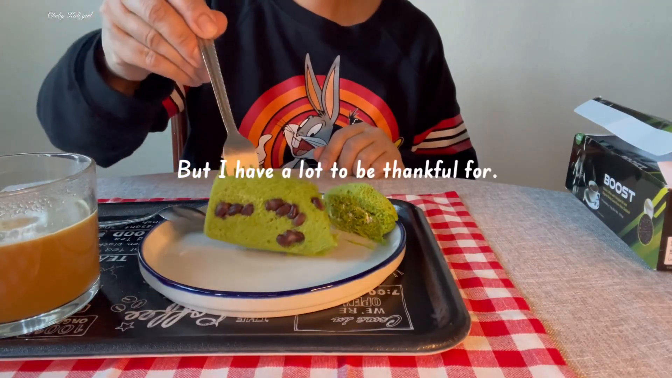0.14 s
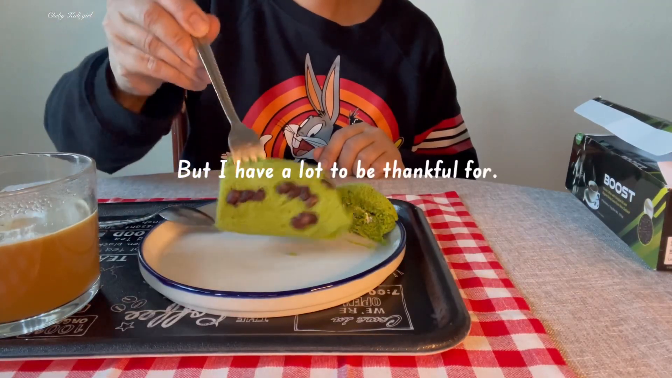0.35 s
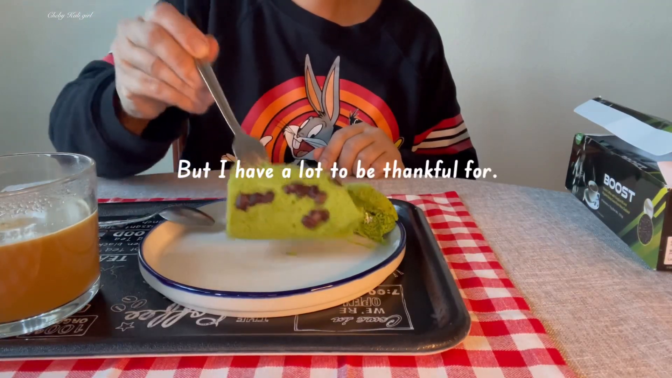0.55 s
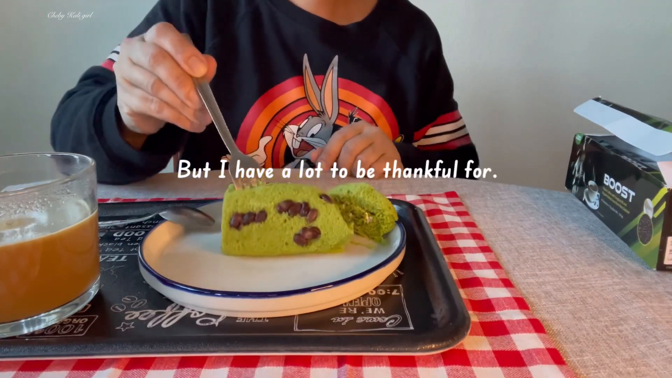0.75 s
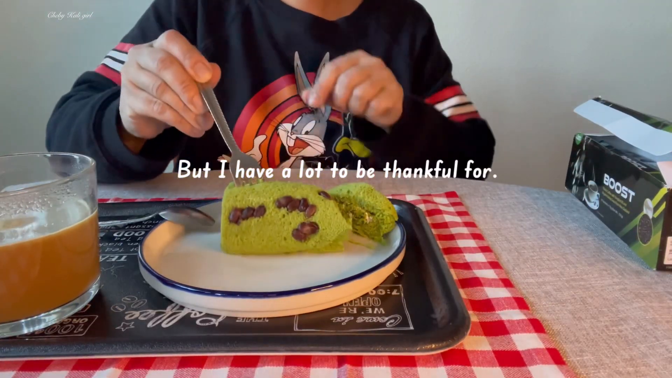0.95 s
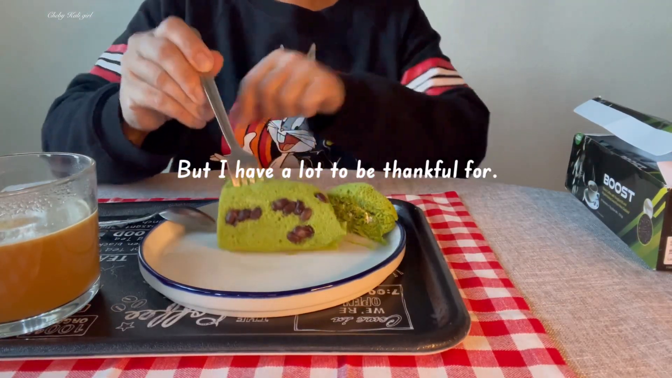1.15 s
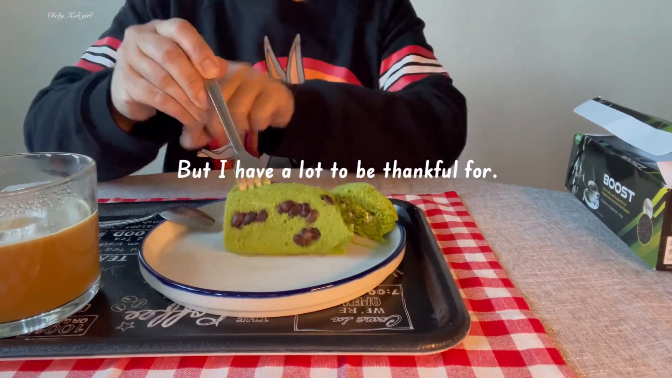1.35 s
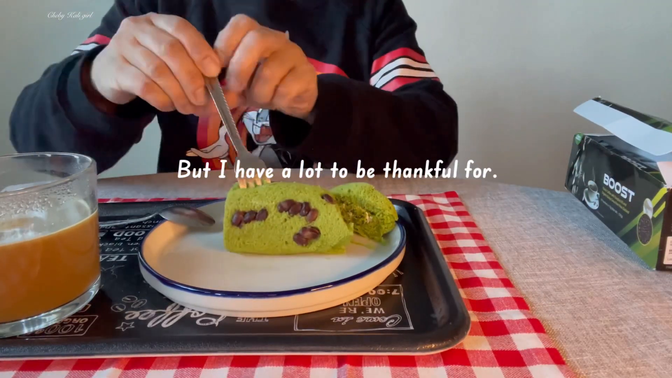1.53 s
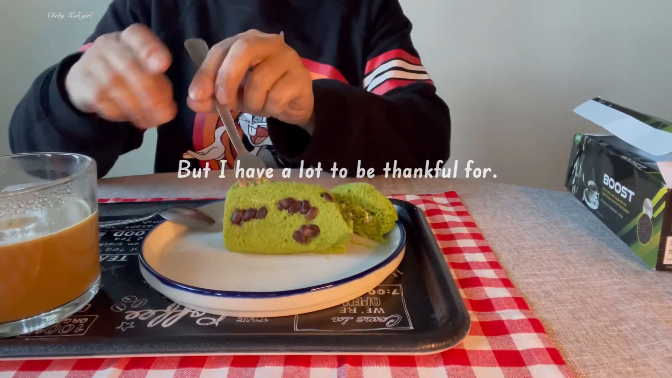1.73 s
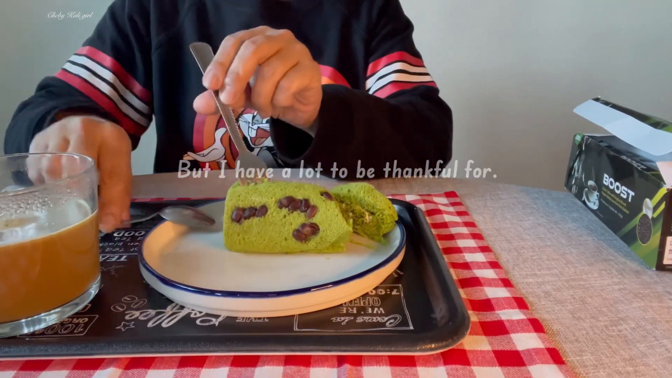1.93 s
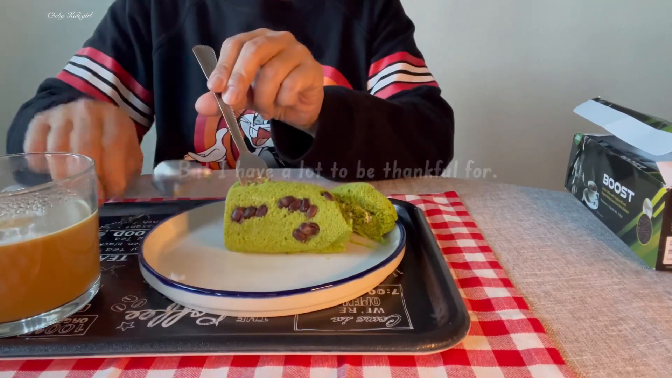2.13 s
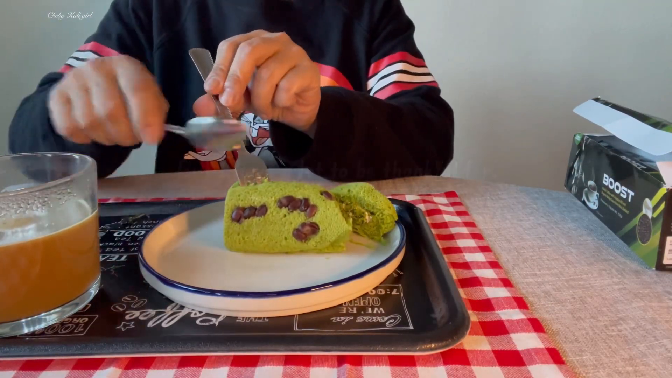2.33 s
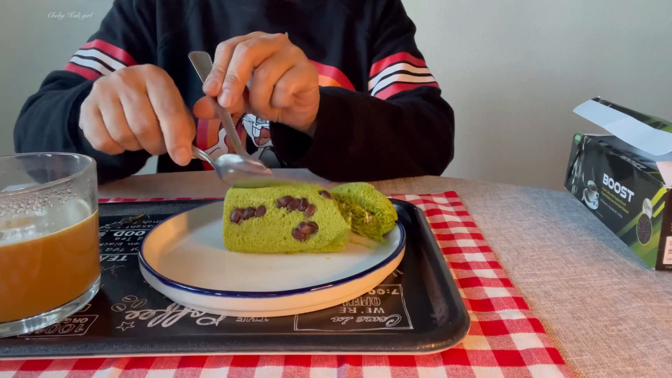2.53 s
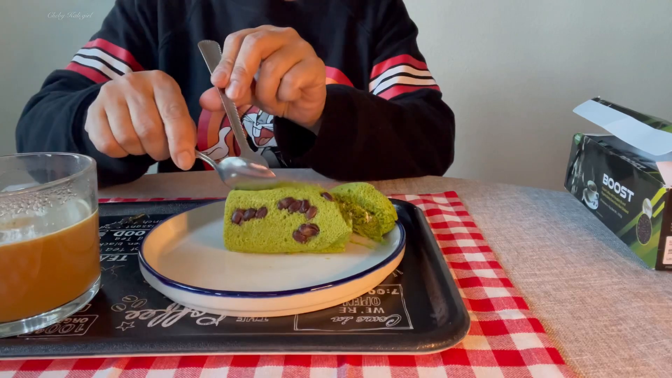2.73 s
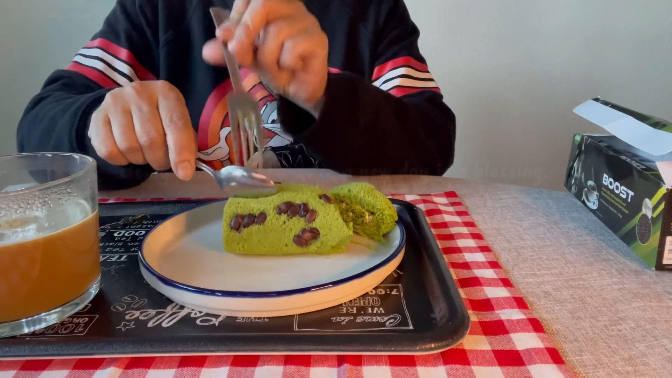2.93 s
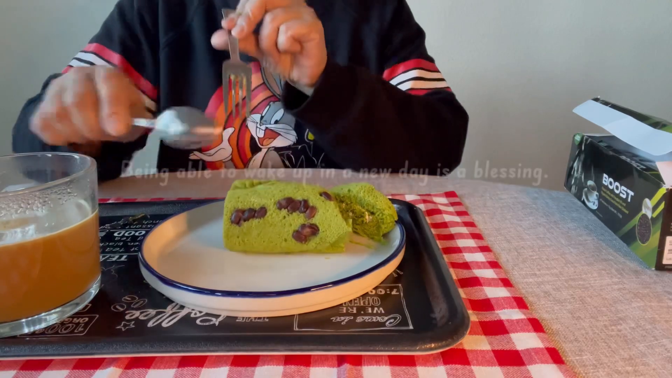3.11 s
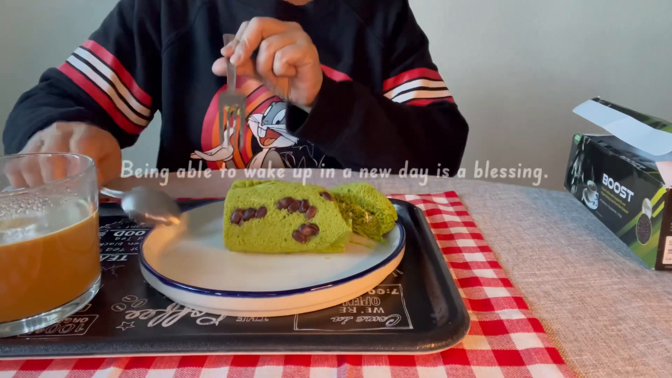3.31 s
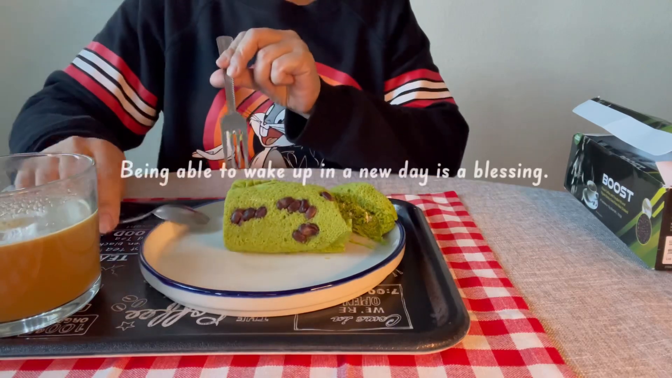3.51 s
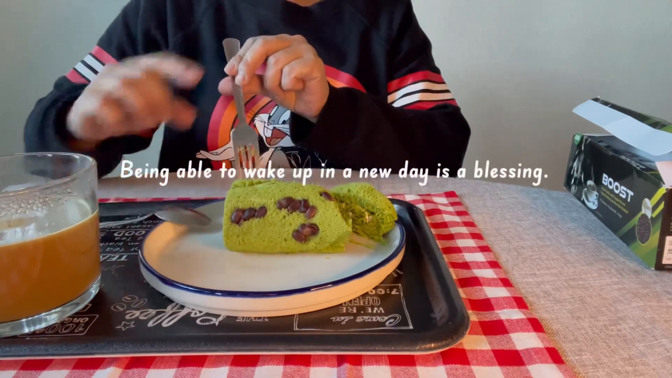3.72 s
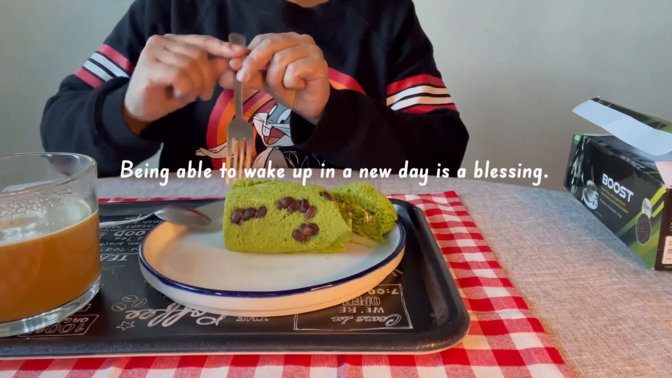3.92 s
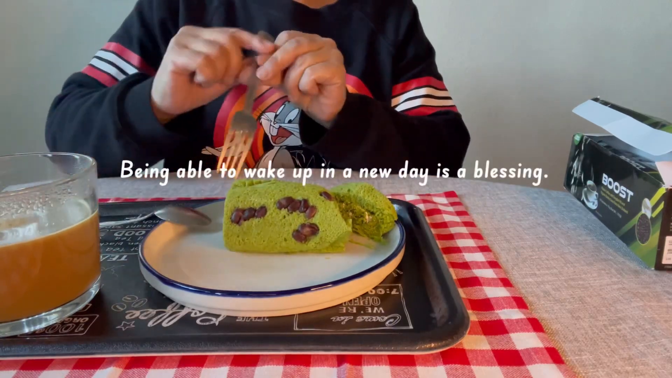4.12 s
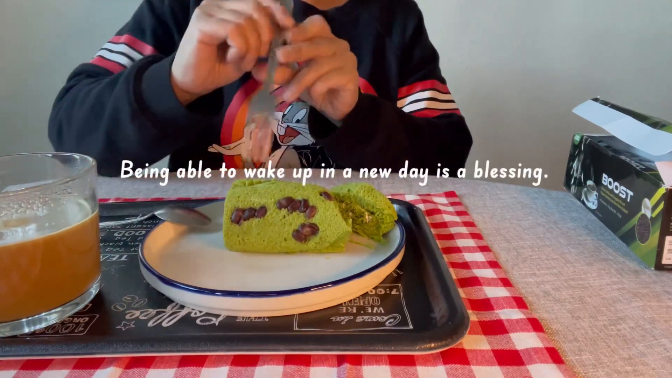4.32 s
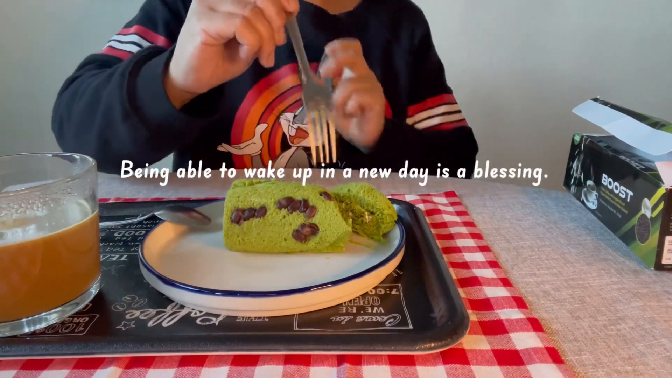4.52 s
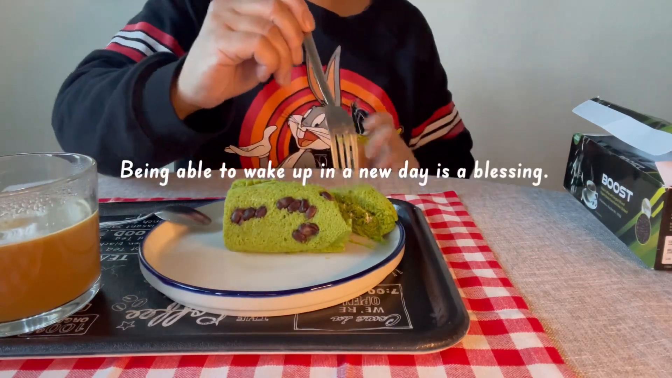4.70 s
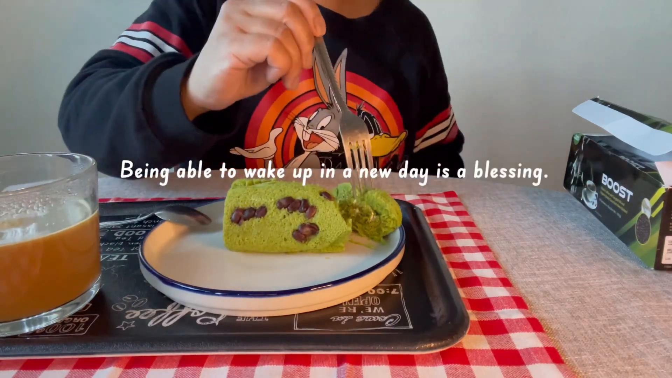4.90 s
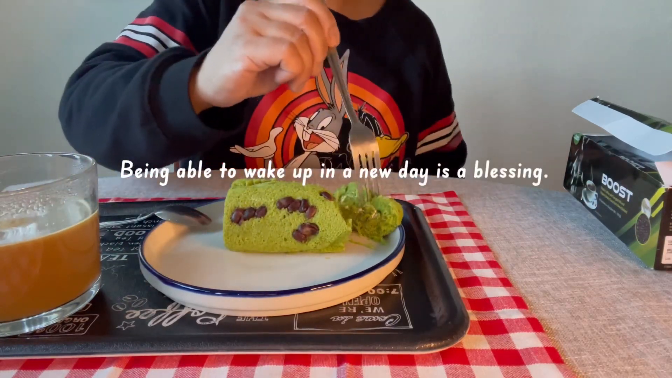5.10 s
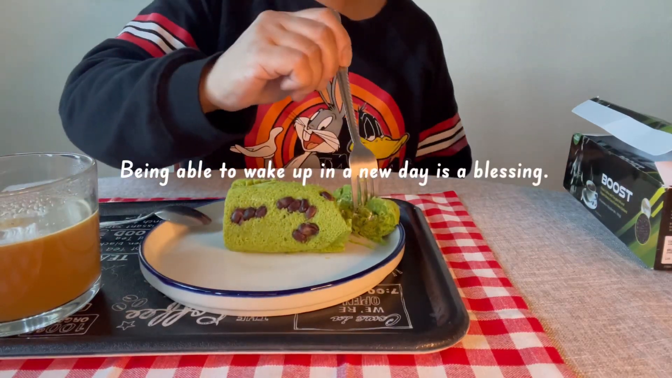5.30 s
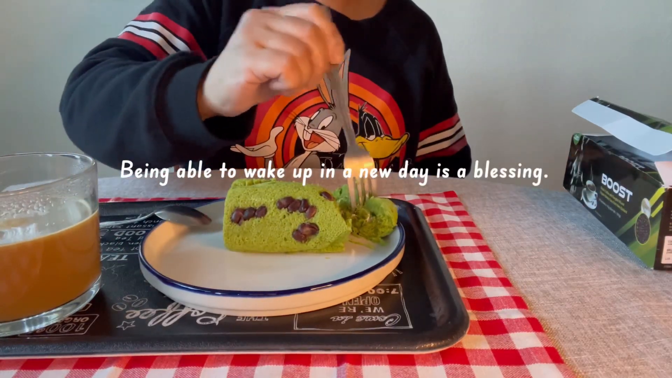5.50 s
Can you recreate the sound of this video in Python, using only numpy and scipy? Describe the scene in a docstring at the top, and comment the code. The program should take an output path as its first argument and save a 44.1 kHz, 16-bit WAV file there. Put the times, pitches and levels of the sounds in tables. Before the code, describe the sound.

A small room heard up close in stereo, with a steady low appliance and ventilation rumble, its motor tone wavering gently. The first second is nearly empty, with one barely audible dull tick around 0.8 s. At about 1.4 s a cluster of soft ticks and low thumps marks hands moving with a fork. Near 2 s two faint knocks land on a plastic tray, then at 2.1 s a spoon grates briefly off a ceramic plate with a small ping. Short, dry metallic taps of spoon on fork follow at 2.4, 2.55 and 3 s, with a soft bump at 2.6 s. At 3.3 s the spoon drops on the plate rim with a sharp, bright clink, bouncing more softly at 3.45 and 3.55 s, ringing briefly with short room echo. Then mostly hum, barely audible sliding after 4 s, a faint tick at 5 s and a quiet fork-on-plate touch at 5.3 s.

```python
"""Serving cake at a small table

Close stereo pair in a small room. Behind the cutlery an appliance rumbles: shaped noise with wavering tones.
A spoon is lifted from a ceramic plate, scrapes and taps a steel fork, then is dropped on the rim, where it
clinks and bounces twice. At the end the fork goes through the cake and touches the plate.
Contacts are noise clicks and decaying modes of steel, ceramic and a plastic tray; slides are uneven noise.
"""
import sys
import numpy as np
from scipy import signal
from scipy.fft import rfft, irfft
from scipy.io import wavfile

SR = 44100
rng = np.random.default_rng(int(sys.argv[2]) if len(sys.argv) > 2 else 0)


def bounce(signal):
    """Save signal as a 16-bit WAV file at the path given by the first command-line argument."""
    frames = np.transpose(np.atleast_2d(signal))
    limited = np.clip(frames, -1, 1)
    pcm = np.round(limited * 32767).astype(np.int16)
    wavfile.write(sys.argv[1], SR, pcm)


N = 244755
TIME = np.arange(N) / SR
FREQ = np.maximum(np.arange(N // 2 + 1) * SR / N, 1)

# Rumble of appliance and ventilation. Each row: frequency in Hz, relative density in dB per Hz.
AIR_SPECTRUM = [(22, -24.5), (48, -5.5), (85, -12.5), (125, -2), (170, -6), (250, -15), (330, -13.5),
                (430, -22), (580, -19), (760, -32.5), (1100, -32.5), (2400, -42), (5000, -57.5),
                (15000, -68)]
AIR_DB = -45
# Stereo width of the rumble. Each row: frequency in Hz, side against mid in dB.
AIR_SIDE = [(60, -13.5), (120, -23), (200, -10.5), (380, 0), (700, 4), (2000, -1), (15000, 0.5)]
# Lean of the background to one side. Each row: frequency in Hz, left minus right in dB.
AIR_LEAN = [(60, -1.5), (110, 0.0), (200, -2.5), (380, -3.5), (700, -0.5), (1290, 3.5), (2380, -0.5),
            (4400, 1.5), (8120, 1.5), (15000, -0.5)]
# Motor hum and fan whine. Each row: frequency in Hz, level in dB, width at half amplitude in Hz.
HUM_TONES = [(59.3, -65.5, 2.006), (117.1, -48, 5.6), (565, -72, 9), (1012.4, -73.5, 51), (1990, -78.5, 95)]

# Decay of the room. Each row: frequency in Hz, t60 in s.
ROOM_DECAY = [(200, 0.219), (1500, 0.404), (5000, 0.44), (9000, 0.3), (15000, 0.17)]
ROOM_DB, ROOM_BUILDUP_S = -12.5, 0.01

# Soft low thumps as the hands move. Each row: start in s, level in dB.
HAND_BUMPS = [(1.379, -33.5), (1.402, -31.5), (2.587, -34.5)]
TABLE_HZ, TABLE_T60_S = 47, 0.23

# The next five tables are modes of struck objects.
# Plastic tray under the plate. Each row: frequency in Hz, level in dB, t60 in s, lead of the left in rad.
TRAY_MODES = [(345, -11, 0.04, .2), (568, -7.5, 0.039, 0.25), (947, -5, .02, 0.5), (1298, 0, 0.024, -0.23),
              (1466, 1, 0.027, 0.31), (1614, -6, 0.0064, -.4), (1890, -9, .02, -.3),
              (2630, -9.5, 0.016, -.5)]
# Ceramic plate. Each row: frequency in Hz, level in dB, t60 in s, lead of the left in rad.
PLATE_MODES = [(1188, 1.5, .055, -.2), (1853, -1.5, .09, -.2), (2300, -15, .1, -.8), (2500, -4.5, .08, -.8),
               (2650, -13, .13, -.8), (3031, -4, .12, -.4), (3125, -7, .11, -.1), (3250, 1, .07, -.3),
               (3322, 1, .14, -.4), (3420, 5, .04, -.2), (3560, -8, .035, 0), (4199, -18, .12, .6),
               (4613, -13, .045, -1.8), (4850, -9, .06, -1), (6200, 4, .05, .2), (6350, -4, .07, .2),
               (6860, -4, .04, .9), (7250, -8, .05, .9)]
# Steel fork, damped by the hand. Each row: frequency in Hz, level in dB, t60 in s, lead of the left in rad.
FORK_MODES = [(900, 3, .028, .5), (1520, 3, .014, -.5), (3300, -7, .014, -.5), (4330, 1.5, .018, 3),
              (4750, 0, .018, 2.5), (5050, -2, .023, -1), (5380, 5, .022, 1.5), (5900, -1, .018, -1),
              (6950, 2, .015, 3), (8650, 6, .018, 2.5), (9050, 6, .022, 2.5), (10050, 7, .02, -2),
              (11200, 0, .025, -1.5), (13770, 0, .015, 2), (15330, 6, .015, -1.5)]
# Spoon gripped in the fingers. Each row: frequency in Hz, level in dB, t60 in s, lead of the left in rad.
HELD_SPOON_MODES = [(4020, -3, .025, 2), (4650, -2, .02, 2.5), (4990, 5, .025, -1), (6080, 1, .018, -1),
                    (7200, -7, .02, 2), (7740, -8, .086, 2), (8150, -13, .1, 2.5), (8580, 5, .018, 2.5),
                    (9950, -2, .018, -2), (11000, -6, .02, -1.5), (12500, -4, .02, 1), (13250, -14, .12, 1),
                    (13780, 9, .015, 2), (14150, 7, .012, 2), (15600, -3, .02, -1.5)]
# The same steel spoon, not gripped. Each row: frequency in Hz, level in dB, t60 in s, lead of the left in rad.
SPOON_MODES = [(5080, -10, .15, -2.3), (5902, -1, .09, -.7), (6011, 6.5, .1, -.6), (7497, -10.5, .22, 1.6),
               (7720, -9, .06, 1.0), (8285, -13, .09, 2.6), (9071, 4.5, .045, -3.14), (9800, -5, .06, -2.2),
               (10313, -10, .13, -1.5), (10490, -9, .13, -1.5), (11241, -1.5, .07, -.4),
               (12323, -4, .13, .7), (13374, -14, .08, 2.5), (13730, -20, .1, 1.5), (15330, -4, .06, -2.1),
               (15670, -11, .09, -2.1)]

# Contact noise before its tilt. Each row: frequency in Hz, relative density in dB per Hz.
CLICK_SPECTRUM = [(200, -12.5), (750, -8.5), (1500, -1.5), (2200, -3), (3200, 1), (4300, -2), (5300, 0),
                  (7000, -1.5), (8500, -10), (12000, -2.5), (14000, -15), (16000, -14)]
# A harder contact clicks brighter: no tilt at this cut-off, and so many dB per octave per octave above it.
NEUTRAL_CUT_HZ, HARDNESS_TILT_DB = 13500, 3.5
SLIDE_DB = -14.5  # slide into a contact, against that contact's strength

# Faint sliding of fingers on the fork, or of the fork in the cake.
# Each row: start in s, length in s, level at the end in dB, tilt in dB per octave.
FAINT_SCRAPES = [(0.98, 0.25, -76.5, -2.5), (4.058, 0.14, -77, -2), (4.25, 0.06, -77, 0),
                 (1.275, 0.039, -67, -5), (1.364, 0.13, -69, 4.5), (2.908, 0.074, -69, 3),
                 (4.977, 0.044, -62.5, -6.5)]
# Ticks of the fork in the cake or the fingers.
# Each row: start in s, level in dB, resonance in Hz, Q, t60 in s, tilt in dB per octave.
FORK_TICKS = [(0.775, -52, 2900, 2.7, 0.03, -7.5), (1.363, -39.5, 1750, 1.7, 0.025, -10),
              (1.3774, -39.5, 1550, 1.1, 0.016, -1), (1.4025, -42.5, 1550, 1.3, 0.019, -4),
              (1.4333, -44.5, 1780, 0.69, 0.021, -10), (5.003, -55, 1980, 1.1, 0.097, -3)]
# Dull knocks on the tray as the cutlery is handled.
# Each row: time in s, strength in dB, contact cut-off in Hz, slide into the knock in s.
TRAY_KNOCKS = [(1.9562, -44.5, 10980, 0.013), (1.989, -46, 4510, 0.0038)]

# The fork tines reach the plate through the cake.
TOUCH_S, TOUCH_DB, TOUCH_CUT_HZ = 5.3245, -54.5, 11000

# The spoon is picked up: it slides along the rim and pings as it leaves.
LIFT_S, LIFT_SLIDE_S, LIFT_DB, LIFT_CUT_HZ = 2.0913, .022, -41.5, 5160
# Resonances of the rubbed rim. Each row: frequency in Hz, Q, level in dB.
RIM_RESONANCES = [(2470, 6.2, -1), (3700, 6.3, -0.5), (6190, 30, 2)]

# Spoon against fork. Each row: time in s, strength in dB, place on the fork in bending half-waves at 1 kHz,
# contact cut-off in Hz, fork ring, spoon ring and tray ring in dB against the strength,
# slide into the tap in s, send to the room in dB.
FORK_TAPS = [ (2.4235, -29.5, 2.34, 17000, -5.5, -17, -1.5, 0.0018, 2),
             (2.552, -28, 0.45, 12600, -3, -18, -9, 0.015, -5.5),
             (2.813, -58, 0.33, 5500, 4, -3, -20, 0.053, 2), (2.834, -62, 0.37, 5500, 1, -3, -20, 0.01, -5),
             (2.979, -31.5, 3.3, 26000, -11.5, -1, -16, 0.00019, -4)]

# The dropped spoon lands and bounces. Each row: time in s, strength in dB, contact cut-off in Hz,
# place on the spoon and on the plate in bending half-waves at 1 kHz,
# spoon ring, plate ring, tray ring and first crack in dB against the strength, time to first rebound in s,
# level step per rebound in dB, lower and upper hollow in the clatter in Hz.
SPOON_LANDINGS = [ (3.3230, -11.5, 21000, 2.70, 7.86, 1.5, -7.5, -30, 4, .0108, -6.5, 5520, 11800),
                  (3.4382, -14, 18200, 6.80, 0.66, -6, -11, -12, 2.16, 0.011, -10, 4330, 6460),
                  (3.5279, -18.5, 14900, 0.23, 6.8, -10.5, -13.5, -7, 1.3, .0078, -5.5, 3890, 11550)]
# Every landing chatters: factors per rebound on the gap and on the contact cut-off.
REBOUND_SHRINK, REBOUND_SOFTENING = .7, .7
REBOUND_CLICK_DB = 3.5  # click of a rebound against its strength

TOP_HZ = 15900


def undb(db):
    """Decibels to gain."""
    return 10 ** (np.asarray(db) / 20)


def along(points, hz):
    """Read (Hz, value) points on a log-frequency axis."""
    f, value = np.transpose(points)
    return np.interp(np.log(hz), np.log(f), value)


def noise(gain):
    """Two unrelated noises of joint rms 1 with the given relative gain at each frequency."""
    x = irfft(rfft(rng.standard_normal((2, N))) * gain, N)
    return x / x.std()


def left_right(mid, side):
    """Turn a mid and a side signal into left and right."""
    return np.array([mid + side, mid - side])


def add(out, s, sound):
    """Mix a sound in at time s."""
    i = int(s * SR)
    out[:, i:i + sound.shape[1]] += sound[:, :N - i]


def fade(t, t60):
    """Exponential decay, 60 dB down after t60."""
    return np.exp(-np.log(1000) * t / t60)


def band(x, hz, q):
    """Pass a sound through one resonance."""
    return signal.lfilter(*signal.iirpeak(min(hz, SR / 2 - 1), q, fs=SR), x)


def hollow(x, hz, q=9):
    """Take a band out of a sound."""
    return signal.lfilter(*signal.iirnotch(min(hz, SR / 2 - 1), q, fs=SR), x)


def appliance(hum_side=0.17):
    """A steady rumble, nearly alike on both sides in the bass, with wavering motor and fan tones."""
    mid, side = rfft(noise(undb(along(AIR_SPECTRUM, FREQ))))
    width = undb(along(AIR_SIDE, FREQ))
    out = undb(AIR_DB) * irfft(left_right(mid, width * side) / np.hypot(1, width), N)
    for hz, db, width_hz in HUM_TONES:
        mid, side = noise(1 / (1 + (2 * (FREQ - hz) / width_hz) ** 2))
        out = out + undb(db) * left_right(mid, hum_side * side)
    lean_db = np.array([[1], [-1]]) * along(AIR_LEAN, FREQ) / 2
    return irfft(rfft(out) * undb(lean_db), N)


def room(x):
    """Diffuse echoes from the walls, unrelated left and right; each frequency band dies at its own rate."""
    t = TIME[:int(.7 * SR)]
    centres = np.geomspace(200, 16000, 8)
    white, tail = rfft(rng.standard_normal((2, N))), 0
    for hz, share in zip(centres, np.eye(len(centres))):
        # overlapping triangles on a log-frequency axis
        weight = np.interp(np.log(FREQ), np.log(centres), share)
        tail = tail + irfft(white * weight, N)[:, :len(t)] * fade(t, along(ROOM_DECAY, hz))
    tail = tail * np.clip(t / ROOM_BUILDUP_S, 0, 1) ** 2
    tail = tail / np.sqrt(np.sum(tail ** 2) / 2)
    return undb(ROOM_DB) * signal.fftconvolve(x, tail, axes=1)[:, :N]


def wash(x, share, width_hz):
    """Blur a share of each ringing tone into a band of noise, by slow random modulation."""
    share = np.clip(share, 0, 1)
    waver = noise(1 / (1 + (FREQ / width_hz) ** 4))
    return x * (np.sqrt(1 - share) + np.sqrt(share) * waver)


def sway(hz, t60):
    """One low, damped swing of the table top."""
    t = TIME[:SR // 2]
    return fade(t, t60) * np.sin(2 * np.pi * hz * t)[None]


def table(thud_hz=70, thud_db=-27, thud_t60=0.17):
    """The table top sways briefly under each bump of the hands and each landing of the spoon."""
    out = np.zeros((2, N))
    for s, db in HAND_BUMPS:
        add(out, s, undb(db) * sway(TABLE_HZ, TABLE_T60_S))
    for s, db, *_ in SPOON_LANDINGS:
        add(out, s, undb(db + thud_db) * sway(thud_hz, thud_t60))
    return out


def ring(modes, place=0, cut_hz=20000, node_db=-12, pan_db=0):
    """Struck modes. A blow near a node barely wakes that mode; each reaches the two microphones out of step."""
    t, out = TIME[:SR // 2], 0
    for hz, db, t60, lead in modes:
        # bending waves shorten with the square root of frequency
        reach = np.hypot(np.cos(np.pi * place * np.sqrt(hz / 1000)), undb(node_db))
        # a soft, long contact cannot drive the fast modes
        push = 1 / np.hypot(1, (hz / cut_hz) ** 4)
        # whatever touches the object detunes it a little
        hz = hz + 3 * rng.standard_normal()
        phase = 2 * np.pi * (hz * t + rng.random()) + np.array([[lead], [-lead]]) / 2
        out = out + reach * push * undb(db) * fade(t, t60) * np.sin(phase)
    onset = 1 - fade(t, 0.0057)
    return out * onset * undb(np.array([[pan_db], [-pan_db]]) / 2)


def grit(envelope, tilt_db, side=0.94):
    """Tiny collisions of hard surfaces as shaped noise, brighter for a sharper edge."""
    n = len(envelope)
    hz = np.maximum(np.arange(n // 2 + 1) * SR / n, 1)
    tilt = tilt_db * np.log2(np.maximum(hz, 500) / 5000)
    gain = undb(along(CLICK_SPECTRUM, hz) + tilt)
    m, s = irfft(rfft(rng.standard_normal((2, n))) * gain, n) / np.sqrt(np.mean(gain ** 2))
    return envelope * left_right(m, side * s) / np.hypot(1, side)


def click(t60, tilt_db, rise_s=0.0037):
    """The brief chatter of two hard surfaces meeting."""
    t = TIME[:SR // 6]
    return grit(fade(t, t60) * (1 - fade(t, rise_s)), tilt_db)


def brightness(cut_hz):
    """Tilt of a click in dB per octave, from the hardness of the contact."""
    return HARDNESS_TILT_DB * np.log2(cut_hz / NEUTRAL_CUT_HZ)


def slide(length, tilt_db, catch_db=1.5, release_t60=0.075):
    """A sliding edge catches unevenly, presses harder and then lets go."""
    t = TIME[:SR // 2]
    pressure = np.minimum(t / length, 1) * fade(np.maximum(t - length, 0), release_t60)
    slips = np.linspace(0, t[-1], 400)
    catches = undb(catch_db * np.interp(t, slips, rng.standard_normal(len(slips))))
    return grit(pressure * catches, tilt_db)


def lead_in(s, db, length, tilt_db=0.5):
    """The slide, if there is one, that ends in a contact at time s."""
    out = np.zeros((2, N))
    if length > 0:
        add(out, s - length, undb(db + SLIDE_DB) * slide(length, tilt_db))
    return out


def contact(steel, place, cut_hz, steel_db, plate_db, tray_db, click_t60,
            plate_place=0, tray_cut_hz=20000, click_db=0):
    """One blow clicks and rings cutlery, plate and tray, according to where and how hard it lands."""
    out = undb(steel_db) * ring(steel, place, cut_hz)
    add(out, 0, undb(plate_db) * ring(PLATE_MODES, plate_place, cut_hz, pan_db=0.5))
    add(out, 0, undb(tray_db) * ring(TRAY_MODES, cut_hz=tray_cut_hz, pan_db=-4.0))
    add(out, 0, undb(click_db) * click(click_t60, brightness(cut_hz)))
    return out


def scrapes():
    """Faint uneven slides of the fork as it is handled."""
    out = np.zeros((2, N))
    for s, length, db, tilt_db in FAINT_SCRAPES:
        add(out, s, undb(db) * slide(length, tilt_db))
    return out


def fork_ticks(edge_db=-9):
    """Small dull ticks of the fork in the cake or the fingers: resonant clicks with a little raw edge."""
    out = np.zeros((2, N))
    for s, db, hz, q, t60, tilt_db in FORK_TICKS:
        tick = click(t60, tilt_db)
        body = band(band(tick, hz, q), hz, q)
        add(out, s, undb(db) * (body + undb(edge_db) * tick))
    return out


def tray_knocks(hollow_hz=4400):
    """Cutlery nudged on the tray: mostly plastic, a little steel."""
    out = np.zeros((2, N))
    for s, db, cut_hz, slide_s in TRAY_KNOCKS:
        knock = contact(FORK_MODES, 0.23, cut_hz, steel_db=-17, plate_db=-23, tray_db=-1, click_t60=0.017)
        add(out, s, undb(db) * hollow(knock, hollow_hz, q=2.2))
        add(out, 0, lead_in(s, db, slide_s))
    return out


def fork_touch(damping_t60=0.22, hollow_hz=4650, knock_hz=1230, knock_db=7, knock_t60=0.074):
    """The tines knock the plate; it rings with the spoon on it, muffled by the cake and the resting fork."""
    out = np.zeros((2, N))
    touch = contact(SPOON_MODES, 14.0, TOUCH_CUT_HZ, steel_db=0, plate_db=9, tray_db=2,
                    click_t60=0.026, plate_place=4.0, click_db=-2)
    add(out, TOUCH_S, hollow(hollow(touch, hollow_hz, q=2.8), hollow_hz, q=3))
    add(out, TOUCH_S, ring([(knock_hz, knock_db, knock_t60, 0)]))
    return undb(TOUCH_DB) * out * fade(np.maximum(TIME - TOUCH_S, 0), damping_t60)


def spoon_lift(slide_db=5, ping_t60=0.28):
    """The spoon grates along the resonant rim and pings as it leaves; the fingers damp the ping."""
    out = np.zeros((2, N))
    rub = slide(LIFT_SLIDE_S, tilt_db=-5.0, catch_db=3.5, release_t60=.025)
    rim = sum(undb(db) * band(band(rub, hz, q), hz, q) for hz, q, db in RIM_RESONANCES)
    add(out, LIFT_S - LIFT_SLIDE_S, undb(slide_db) * (rim + undb(-22) * rub))
    ping = contact(SPOON_MODES, 2.27, LIFT_CUT_HZ, steel_db=4, plate_db=-11, tray_db=-24,
                   click_t60=0.023, plate_place=10.56, click_db=-3)
    add(out, LIFT_S, ping * fade(TIME[:ping.shape[1]], ping_t60))
    return undb(LIFT_DB) * out


def fork_taps():
    """Held fork and spoon tick, short and metallic; returns the taps and what they send to the walls."""
    out, to_walls = np.zeros((2, N)), np.zeros((2, N))
    for s, db, place, cut_hz, fork_db, spoon_db, tray_db, slide_s, room_db in FORK_TAPS:
        tap = lead_in(s, db, slide_s)
        blow = contact(FORK_MODES, place, cut_hz, fork_db, plate_db=-31, tray_db=tray_db,
                       click_t60=0.017, tray_cut_hz=1210)
        add(tap, s, undb(db) * blow)
        add(tap, s, undb(db + spoon_db) * ring(HELD_SPOON_MODES, cut_hz=cut_hz))
        out = out + tap
        to_walls = to_walls + undb(room_db) * tap
    return out, to_walls


def spoon_drop(count=3):
    """The spoon lands and bounces twice, on other spots; each landing is a crack and softer, quicker rebounds."""
    out = np.zeros((2, N))
    for (s, db, cut_hz, place, plate_place, spoon_db, plate_db, tray_db, crack_db,
         gap, step_db, low_hz, high_hz) in SPOON_LANDINGS:
        for rebound in range(count):  # 0 is the first crack
            blow = contact(SPOON_MODES, place, cut_hz * REBOUND_SOFTENING ** rebound,
                           spoon_db, plate_db, tray_db, click_t60=.024, plate_place=plate_place,
                           click_db=REBOUND_CLICK_DB if rebound else crack_db)
            clatter = hollow(hollow(blow, low_hz), high_hz)
            add(out, s, undb(db + rebound * step_db) * clatter)
            s = s + gap * REBOUND_SHRINK ** rebound
    return out


def scene():
    """Tableware close by, its echo, and the hum of the room. Taps blur more in the echo than the rest."""
    close = spoon_lift() + spoon_drop() + tray_knocks() + fork_ticks() + fork_touch() + scrapes()
    taps, taps_to_walls = fork_taps()
    echo = room(wash(close, share=.08, width_hz=330) + wash(taps_to_walls, share=.5, width_hz=500))
    return close + taps + echo + table() + appliance()


def record(dry):
    """The recorder cuts the top with a steep low-pass."""
    return signal.sosfilt(signal.ellip(8, .2, 70, TOP_HZ, fs=SR, output="sos"), dry)


dry = scene()
out = record(dry)
bounce(out)
```